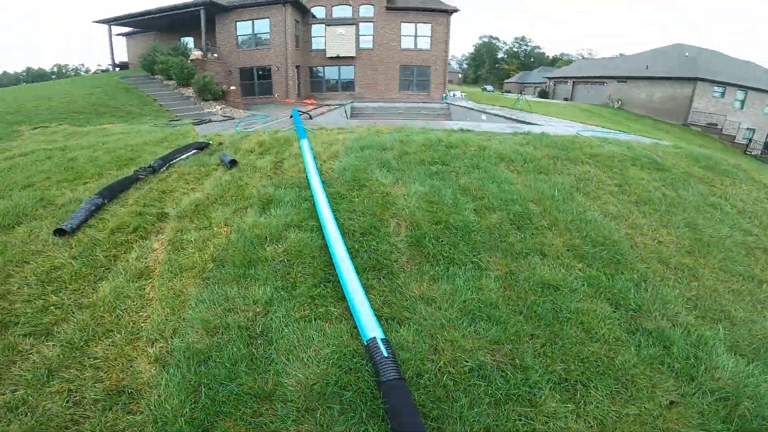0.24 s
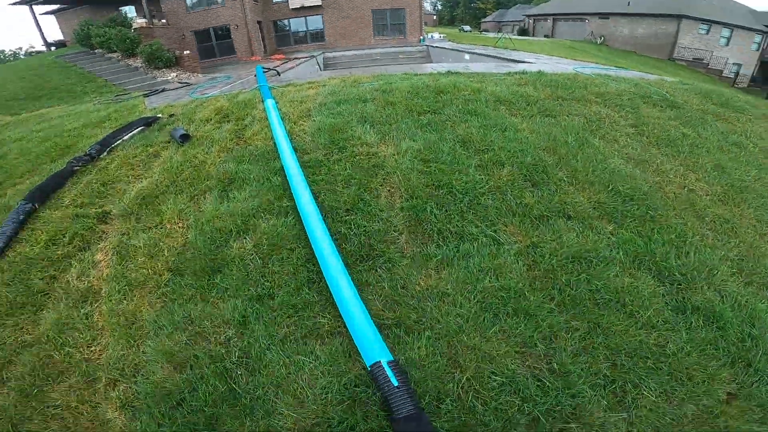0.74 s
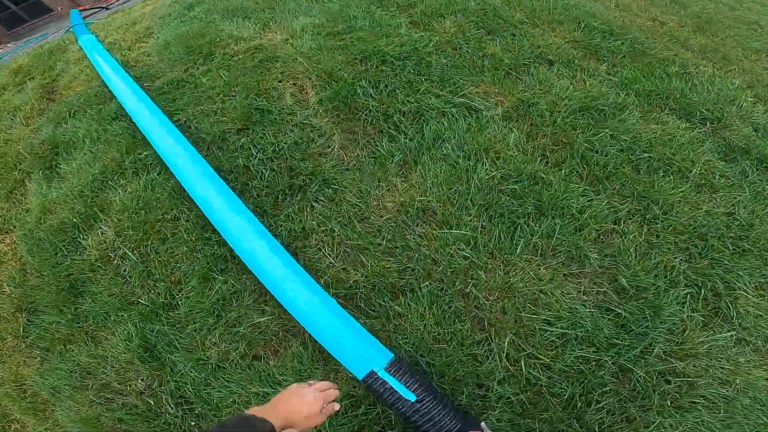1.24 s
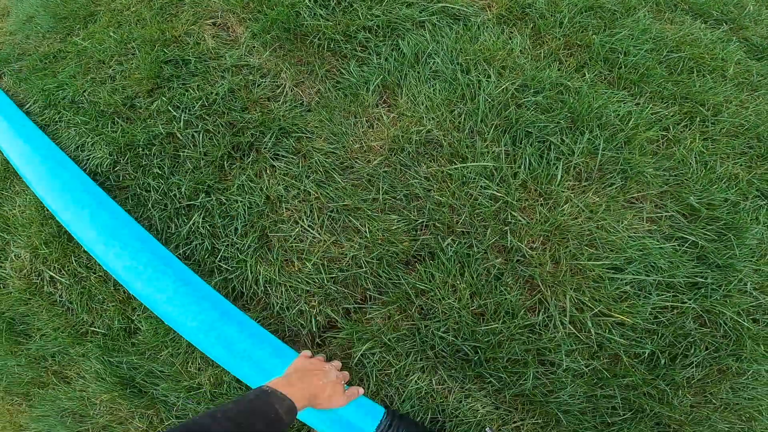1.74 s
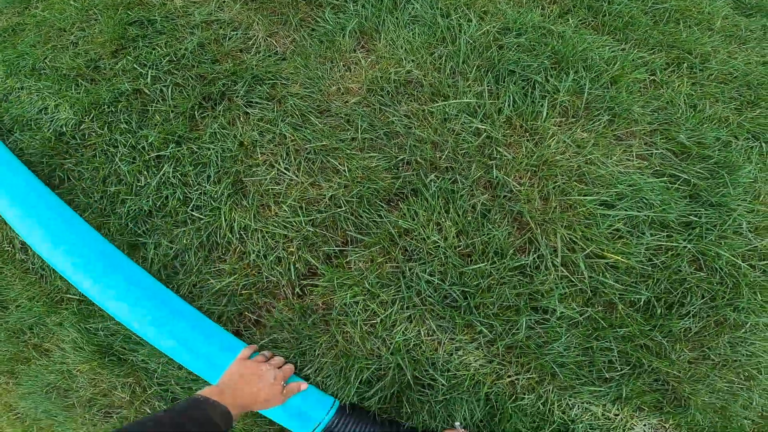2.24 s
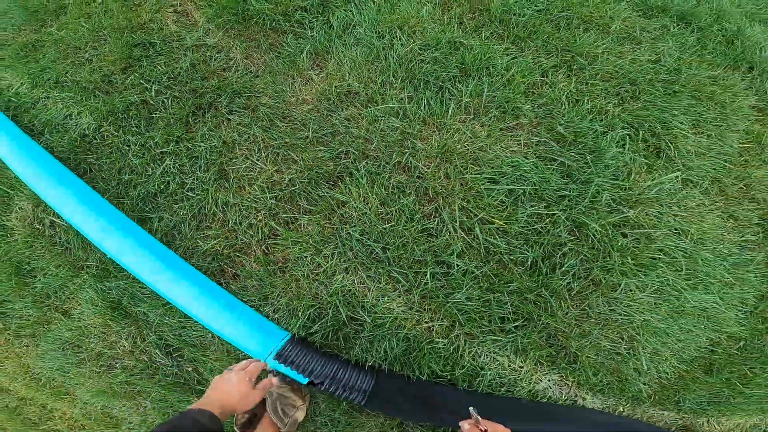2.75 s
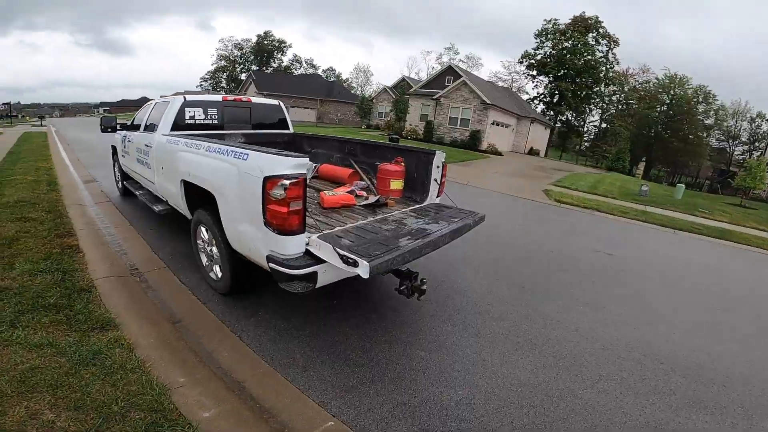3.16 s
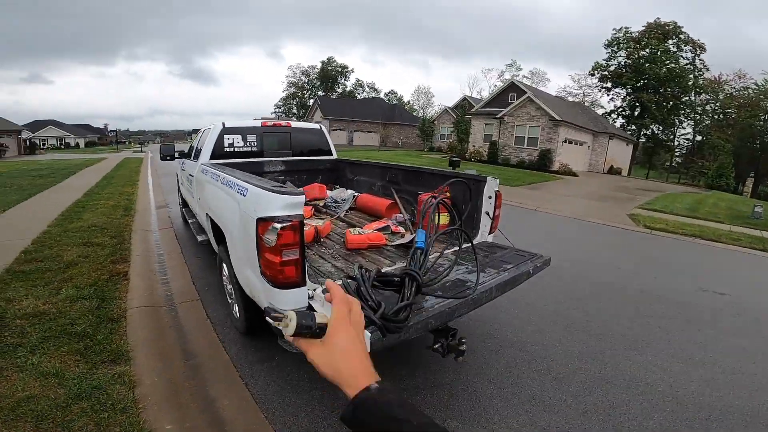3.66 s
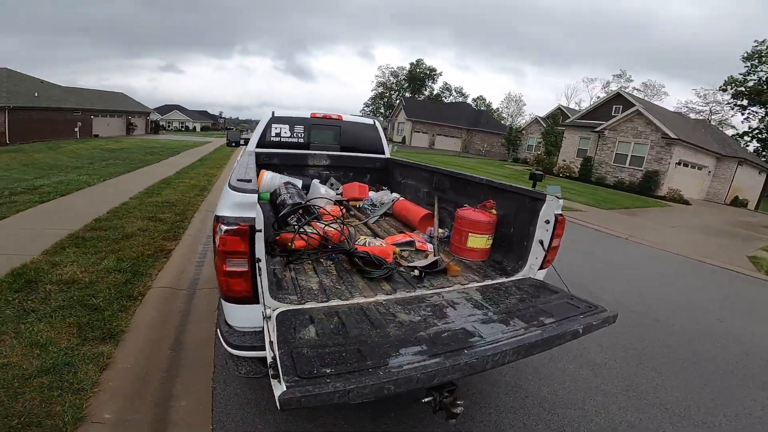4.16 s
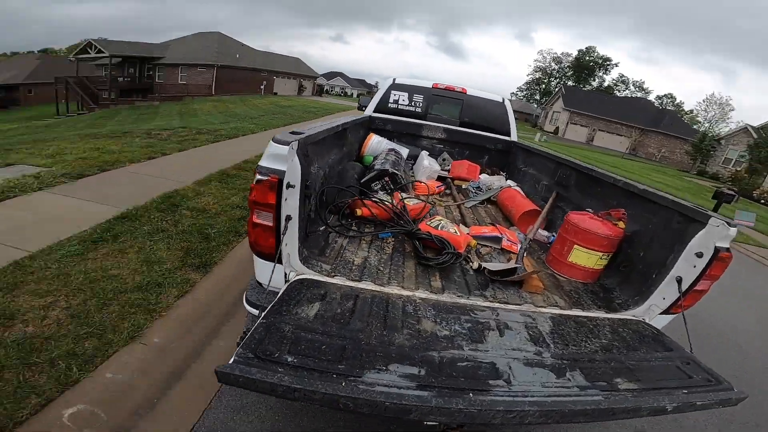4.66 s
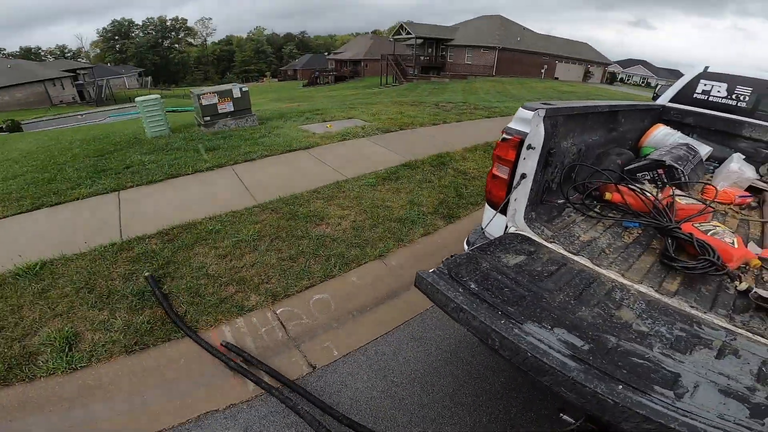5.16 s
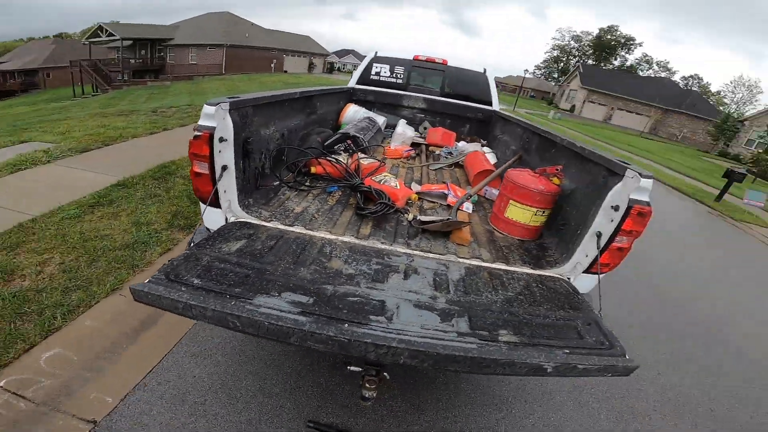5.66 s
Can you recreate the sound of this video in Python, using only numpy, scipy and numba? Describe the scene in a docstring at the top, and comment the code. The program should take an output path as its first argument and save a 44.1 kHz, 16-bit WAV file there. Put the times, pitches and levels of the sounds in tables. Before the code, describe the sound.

A hissing, hollow water flow with grass rustles cuts to a quiet street, where a coil clatters into a truck bed and ribbed hose is dragged.

```python
"""Water hisses and gurgles from a plastic hose on a lawn while hands knock it and slide it over the grass;
then, on a quiet street, a coil of cable clatters into a pickup bed and a ribbed hose is dragged along.
Spray, blades, cloth and grit are random clicks; hose, bed, fittings and cable taps are damped resonances.
A body-worn camera hears it nearly in mono, with jacket rustle, wind and handling rumble in both places."""
import sys
import numpy as np
from scipy import signal
from scipy.fft import rfft, irfft, next_fast_len
from scipy.io import wavfile
from scipy.ndimage import uniform_filter1d
from numba import njit

SR = 44100
rng = np.random.default_rng(int(sys.argv[2]) if len(sys.argv) > 2 else 0)


def store_pcm(level_fs):
    """Save levels as 16-bit WAV."""
    pcm = np.round(np.clip(level_fs, -1, 1) * 32767).astype(np.int16)
    wavfile.write(sys.argv[1], SR, np.atleast_2d(pcm).T)


N = 260190
TIME = np.arange(N) / SR
# the lawn gives way to the street
LAWN_END_S, LAWN_FADE_S = 2.9, .01

# In every colour table only the shape counts: the filter brings the overall gain to rms 1.

# flow of the water, before the shares of spray and hollow: time_s, level_db
FLOW = [(0, -47.5), (.65, -46), (1.1, -45), (1.5, -42.3), (2, -42.3), (2.5, -43.7), (2.9, -44)]
# main resonance of the water-filled hose, before it drifts: time_s, pitch_hz
HOLLOW = [(0, 2280), (1.1, 2400), (1.6, 2602), (1.95, 2700), (2.3, 2340), (2.6, 2210), (2.9, 2359)]
# resonances of the water-filled hose: multiple of the main one, width_hz, level_db
WATER_MODES = [(0.351, 260, -1), (0.429, 242, 1), (1, 500, -0.5), (1.43, 780, -4)]
# colour of the spray: frequency_hz, density_db (per Hz)
SPRAY_COLOUR = [(150, 6), (450, -5.5), (750, 4), (1080, 2), (1650, -1), (2000, -1), (2290, 7), (2800, 0),
                (3450, 1.5), (4800, -3.5), (7500, -11), (10000, -14), (13000, -23.5), (15500, -55)]
SPRAY_DB, HOLLOW_DB = -1.5, -5  # relative to the flow
GURGLE_DB, GURGLE_DRIFT = 3.2, .06  # wander of each resonance: level in dB, pitch as a share


def water():
    """Fine spray over churning noise that rings the hollow hose; its resonances shift and gurgle."""
    spray = crackle(rate=2700, spread_db=5.0, smooth_db=5) * amp(0.44 * walk(26.36))
    churn = rng.standard_normal(N)
    hollow_hz = np.interp(TIME, *np.transpose(HOLLOW))
    gurgle = np.zeros(N)
    for multiple, width_hz, db in WATER_MODES:
        level = amp(db + GURGLE_DB * walk(22.24))
        mode_hz = multiple * hollow_hz * np.exp(GURGLE_DRIFT * walk(13))
        gurgle += level * resonate(churn, mode_hz, width_hz)
    flow = amp(np.interp(TIME, *np.transpose(FLOW))) * on_lawn()
    return (amp(SPRAY_DB) * colour(spray, SPRAY_COLOUR) + amp(HOLLOW_DB) * unit(gurgle)) * flow


# splashy surges of the outflow: start_s, length_s, level_db, pitch_hz (middle of the bubble pitches)
SPLASHES = [(1.24, .08, -52, 2850), (1.86, .07, -45.5, 2850), (2.17, .17, -50, 3150),
            (2.41, .12, -50, 1700), (2.69, .04, -49, 3050)]
SPLASH_FADE_S = .035


def splashes():
    """The outflow surges and whips up small bubbles, of another size with each surge."""
    bubbles = grains(glide(SPLASHES, axis=3), octaves=.3, cycles=22, spread_db=4, rise=.2, count=3000)
    return bubbles * strokes(SPLASHES, SPLASH_FADE_S, SPLASH_FADE_S)


# pushes of the hose through the grass: start_s, length_s, level_db
PUSHES = [(1.65, 0.076, -60), (1.87, 0.14, -53), (2.24, 0.16, -45), (2.57, 0.11, -41)]
# colour of the blades: frequency_hz, density_db (per Hz)
GRASS_COLOUR = [(200, -16), (450, -8.5), (850, 10), (1600, -0.5), (2500, 4.5), (3500, 1.5), (5000, -7),
                (7000, -13), (10000, -25), (13000, -34), (15500, -51)]
PUSH_ATTACK_S, PUSH_RELEASE_S = 0.13, 0.15
GRASS_BOUNCE_DB = -17  # sound off the ground, relative to the direct sound


def grass():
    """Blades flick against the sliding hose; a bounce off the ground, moving in lag, shifts their colour."""
    blades = crackle(rate=1600, spread_db=13.0, smooth_db=0.5) * amp(walk(34.97))
    lag_s = 0.00076 * np.exp(0.3 * walk(9))
    bounced = blades + amp(GRASS_BOUNCE_DB) * np.interp(TIME - lag_s, TIME, blades)
    return colour(bounced, GRASS_COLOUR) * strokes(PUSHES, PUSH_ATTACK_S, PUSH_RELEASE_S) * on_lawn()


# loops of the coil landing in the bed: time_s, knock_db, slap_db (relative to the knock), thud_hz
BLOWS = [(4.040, -13.5, -7, 217), (4.064, -10.5, -10, 196), (4.083, -13, -15, 175), (4.100, -12, -18, 158),
         (4.112, -14, -25, 170), (4.136, -15, -12, 203), (4.150, -10.5, -14, 133), (4.166, -20, -18, 170),
         (4.217, -19, -5.5, 200), (4.230, -14, -7, 80), (4.259, -15, -13, 207), (4.270, -15, -7, 207),
         (4.284, -12, -16, 286), (4.295, -12, -15, 226), (4.304, -13, -11, 226), (4.320, -22, -24, 100),
         (4.338, -24, -20, 136), (4.354, -24, -11, 197), (4.374, -12.5, -18, 192), (4.392, -22, -14, 250),
         (4.411, -21, -17, 303), (4.431, -22.5, -15, 316), (4.483, -34, -10, 284), (4.5, -31, -12, 152.8),
         (4.538, -17.5, -22, 207), (4.609, -32, -24, 272)]
# panel modes of the bed: pitch_hz, level_db, t60_s
BED_MODES = [(135.5, -4.5, 0.42), (208, -8, 0.82), (303, -5, 0.43), (414.4, -3.5, .4), (501, 0.5, 0.36),
             (591, -6, 0.3), (726, -6, .26), (810, -8, 0.16), (1030, -0.5, 0.12), (1067, -6.5, 0.17),
             (1400, -12, 0.15)]
# the plug strikes the bed with a bright crack: time_s, level_db
CRACKS = [(4.038, -27.5), (4.065, -35), (4.153, -45), (4.303, -41)]
# colours of knock, slap and crack: frequency_hz, density_db (per Hz)
KNOCK_COLOUR = [(20, -31), (60, -6), (150, -0.5), (300, 4), (500, 1.5), (700, -0.5), (1100, -7),
                (1400, -11.5), (1650, -23), (2400, -29), (4000, -53), (9000, -72)]
SLAP_COLOUR = [(300, 11), (1200, 14), (1700, -0.5), (2300, 8), (3500, -2), (5000, -5), (6500, -13.5),
               (9000, -21.5), (11000, -27.5), (15500, -52)]
CRACK_COLOUR = [(500, -21), (2000, 10), (5000, 6), (10000, 2.5), (15500, -33)]
CRACK_T60_S = 0.019
REBOUND_S, REBOUND_DB = .011, -6.5  # a loop lands again, softer, about this much later
FLEX_DB, FLEX_REF_HZ, FLEX_TILT_DB = -20.5, 196, -5.5  # thud of the floor; tilt per octave
FLEX_SOFTNESS = 0.45  # dB more thud per dB less knock: a loop that lands flat pushes rather than strikes
SETTLE_DB_PER_S = 25  # the thuds weaken as the coil comes to rest
PANELS_DB = -9


def coil():
    """Each loop slaps the liner and rebounds, flexes the floor where it lands and rings the bed's panels."""
    knocks, slaps, cracks, thuds, panels = np.zeros((5, N))
    first_s = BLOWS[0][0]
    for s, blow_db, slap_db, thud_hz in BLOWS:
        rebound_s = s + REBOUND_S * rng.uniform(0.65, 1.9)
        for when, db in (s, blow_db), (rebound_s, blow_db + REBOUND_DB):
            # a hard first contact, then the dense ring of the liner
            add(knocks, when, amp(db + 12.0) * np.ones(1))
            add(knocks, when, amp(db) * (burst(.05) + amp(-10) * burst(.2)))
            slap = amp(2.0) * burst(0.038) + amp(-5.0) * burst(0.27)
            add(slaps, when, amp(db + slap_db) * slap)
        thud_db = FLEX_DB - FLEX_SOFTNESS * blow_db - SETTLE_DB_PER_S * (s - first_s)
        thud_db += FLEX_TILT_DB * np.log2(thud_hz / FLEX_REF_HZ)
        add(thuds, s, amp(thud_db) * ring(thud_hz, 0.13))
        # every landing spot favours other modes
        shares = rng.uniform(-0.89, 1, len(BED_MODES))
        for share, (hz, db, t60) in zip(shares, BED_MODES):
            add(panels, s, amp(blow_db + db) * share * ring(hz, t60))
    for s, db in CRACKS:
        add(cracks, s, amp(db) * burst(CRACK_T60_S))
    # neighbouring strands chatter against each other
    chatter = unit(amp(1.8 * walk(400)))
    struck = colour(knocks, KNOCK_COLOUR) + colour(slaps * chatter, SLAP_COLOUR) + colour(cracks, CRACK_COLOUR)
    return struck + thuds + amp(PANELS_DB) * panels


# loose turns of cable rattle: start_s, length_s, level_db
SETTLING = [(3.58, .11, -50), (3.77, .22, -54), (4.06, .04, -39), (4.22, .09, -39), (4.33, .1, -46),
            (4.58, .13, -51)]
STRAND_HZ, SETTLING_ATTACK_S, SETTLING_RELEASE_S = 2660, 0.008, 0.027


def strands():
    """Loose turns of cable tick against each other from the swing until the coil lies still."""
    ticks = grains(STRAND_HZ, octaves=.45, cycles=16, spread_db=2.5, rise=0, count=1300)
    return ticks * strokes(SETTLING, SETTLING_ATTACK_S, SETTLING_RELEASE_S)


# drags of the ribbed hose: start_s, length_s, hollow rasp_db, dry scrape_db, main pitch_hz (before drift)
DRAGS = [(1.42, 0.19, -48, -49, 960), (1.59, 0.11, -46, -47, 1042), (1.76, 0.22, -48.5, -47, 1013),
         (2.0, 0.34, -74, -50, 900), (5.12, 0.13, -41.5, -57, 1120), (5.335, 0.16, -38.5, -49, 1150),
         (5.47, 0.15, -35, -37, 1080), (5.72, 0.084, -40.5, -46, 1110), (5.84, .06, -46, -54, 963)]
# a rib snags and lets go: time_s, rasp_db, scrape_db
SNAGS = [(5.067, -40, -41), (5.091, -42, -38), (5.106, -40, -34), (5.236, -35, -37), (5.260, -38, -33),
         (5.331, -30, -33), (5.354, -23.5, -35), (5.415, -24, -29.5), (5.441, -29, -46), (5.469, -31, -31),
         (5.501, -29, -33), (5.546, -29, -37), (5.572, -30, -35), (5.621, -29, -35), (5.649, -29, -31),
         (5.733, -35, -40), (5.819, -38, -37), (5.868, -34, -50)]
# resonances of the ribbed hose: multiple of the main one, width_hz, level_db
HOSE_MODES = [(1, 140, 2), (.8, 300, -8), (1.8, 190, -8), (2.08, 125, -8), (2.5, 340, -18.5)]
# colour of the scraping skin: frequency_hz, density_db (per Hz)
SCRAPE_COLOUR = [(300, 0), (900, 11.5), (1600, -21), (2600, 8), (4800, -2.5), (6500, -5.5), (10000, -10.5),
                 (11200, -26), (13000, -16), (15500, -52)]
DRAG_ATTACK_S, DRAG_RELEASE_S = 0.036, 0.052
SNAG_RING_T60_S, SNAG_SCRAPE_T60_S = .06, .03
BEND_DRIFT = .03  # wander of each resonance, as a share of its pitch


def dragged_hose():
    """Ribs catch one after another; the tube rings hollow, retuned as it bends, while its skin scrapes."""
    rib_hz = 70 * np.exp(0.32 * walk(50))
    rib_cycle = np.cos(2 * np.pi * np.cumsum(rib_hz) / SR)
    catching = unit(amp(2.4 * rib_cycle + walk(120)))
    ribs = crackle(rate=1200, spread_db=1.0, smooth_db=2.0) * catching
    main_hz = glide(DRAGS, axis=4)
    tube = np.zeros(N)
    for multiple, width_hz, db in HOSE_MODES:
        mode_hz = multiple * main_hz * np.exp(BEND_DRIFT * walk(30))
        tube += amp(db) * resonate(ribs, mode_hz, width_hz)
    skin = crackle(rate=1500, spread_db=3.5, smooth_db=0)
    rasp = strokes(DRAGS, DRAG_ATTACK_S, DRAG_RELEASE_S)
    scrape = strokes(DRAGS, DRAG_ATTACK_S, DRAG_RELEASE_S, axis=3) * catching
    for s, rasp_db, scrape_db in SNAGS:
        add(rasp, s, amp(rasp_db) * fade(SNAG_RING_T60_S))
        add(scrape, s, amp(scrape_db) * fade(SNAG_SCRAPE_T60_S))
    return unit(tube) * rasp + colour(skin, SCRAPE_COLOUR) * scrape


GRIT_HZ, GRIT_DB = 4200, -6  # middle pitch; level relative to the dry scrape of the drags


def road_grit():
    """Grit crunches in tiny snaps under the hose as it is dragged over the road."""
    snaps = grains(GRIT_HZ, octaves=1.1, cycles=5, spread_db=5, rise=0, count=1500)
    drags = strokes(DRAGS, DRAG_ATTACK_S, DRAG_RELEASE_S, axis=3)
    return amp(GRIT_DB) * snaps * drags * (1 - on_lawn())


# knocks and ticks of hose, fittings and cable strands: time_s, ring level_db, pitch_hz (once relaxed),
# t60_s, rattle_db (relative to the ring)
KNOCKS = [(1.368, -41, 524, 0.049, 2.5), (1.454, -23.5, 224, 0.16, -40), (1.550, -25, 390, 0.045, -14),
          (1.551, -24, 926, 0.045, -14), (1.556, -31.5, 2470, 0.033, -20), (3.282, -36, 580, 0.035, -7),
          (3.528, -39, 1870, .06, 1), (3.576, -33, 1220, .03, -3), (3.613, -33, 1050, .03, 0),
          (3.617, -30, 2500, .03, -2), (3.853, -39, 3300, .012, 0), (3.912, -25, 1080, .03, -3),
          (3.922, -34, 1300, .02, -2), (3.970, -38, 2150, .015, -2), (4.041, -29, 4400, .022, 2),
          (4.065, -23, 2400, .025, -6), (4.100, -22, 1680, .025, -8), (4.135, -21, 1570, .025, -7),
          (4.219, -25, 2410, .03, -4), (4.233, -24, 2900, .025, -6), (4.272, -21, 1790, .025, -7),
          (4.148, -22, 3300, .048, 1), (4.305, -15, 2060, .022, -7), (4.538, -31, 914, .05, -10),
          (4.606, -28, 2650, .02, -12), (4.644, -35, 2640, .02, -21), (4.854, -36.5, 1050, .02, 1),
          (4.914, -31, 2100, .02, 3), (5.383, -22, 2206, .05, -10)]
CLICK_DB = -8  # contact click relative to the rattle


def knocks_and_taps():
    """Short hard knocks and taps: a contact click, one damped ring and a rattle of modes around it."""
    rings, clicks = np.zeros((2, N))
    for s, db, hz, t60, rattle_db in KNOCKS:
        rattle = unit(resonate(rng.standard_normal(SR // 2), hz, 650 + hz / 4)) * fade(t60)
        # the ring starts 90 Hz sharp
        add(rings, s, amp(db) * (ring(hz, t60, sag=90 / hz) + amp(rattle_db) * rattle))
        add(clicks, s, amp(db + rattle_db + CLICK_DB) * burst(0.026))
    return rings + colour(clicks, SLAP_COLOUR)


# body movements that rustle the jacket and shake the camera mount:
# start_s, length_s, cloth_db, judder_db, judder_hz (before its jitter)
MOVES = [(0, 0.064, -50.5, -73, 161), (.85, 0.013, -47.5, -53, 160), (1.87, 0.33, -47.5, -44.5, 149.3),
         (2.86, 0.06, -56, -45, 150), (3.42, .08, -52, -52, 150), (3.535, 0.11, -40.5, -36.5, 149.8),
         (3.645, 0.12, -51.5, -29.5, 123.1), (3.85, 0.22, -48, -36, 143.3), (4.55, 0.19, -49, -40.5, 182.7),
         (4.8, 0.304, -47.5, -69, 150.7), (5.11, 0.091, -36, -38.5, 175), (5.258, 0.057, -32.5, -21, 165),
         (5.55, 0.4, -37.5, -50, 220.2)]
# colour of the cloth: frequency_hz, density_db (per Hz)
CLOTH_COLOUR = [(120, -29.5), (400, 0), (750, -1.5), (1150, -1.5), (1600, -7.5), (2300, -4.5), (3500, -12),
                (6000, -19.5), (10000, -28.5), (13000, -42), (15500, -79)]
MOVE_ATTACK_S, CLOTH_RELEASE_S = 0.012, 0.19


def jacket():
    """Folds of cloth catch and slip in quick uneven spurts."""
    folds = crackle(rate=900, spread_db=3.3, smooth_db=1) * amp(2 * walk(110))
    return colour(folds, CLOTH_COLOUR) * strokes(MOVES, MOVE_ATTACK_S, CLOTH_RELEASE_S)


JUDDER_RELEASE_S = 0.036
JUDDER_REST_DB = -56.5  # the mount is never quite still
JUDDER_JITTER, JUDDER_ROUGH_DB = 0.22, 5  # spread of the cycle rate (share) and of the cycle size


def mount():
    """With each body movement the camera mount judders in uneven stick-slip cycles."""
    judder_hz = glide(MOVES, axis=4) * np.exp(JUDDER_JITTER * walk(260))
    phase = 2 * np.pi * np.cumsum(judder_hz) / SR
    cycles = np.sin(phase) + amp(-13) * np.sin(2 * phase)
    judder = unit(cycles * amp(JUDDER_ROUGH_DB * walk(110)))
    return judder * np.hypot(amp(JUDDER_REST_DB), strokes(MOVES, MOVE_ATTACK_S, JUDDER_RELEASE_S, axis=3))


# gusts on the microphone: start_s, length_s, level_db
GUSTS = [(.06, 0.1, -44), (.9, 0.052, -48), (1.35, 0.94, -47.5), (2.5, 0.71, -45), (3.19, 0.16, -38.5),
         (3.58, 0.15, -32.5), (3.85, 0.96, -41), (4.74, 0.041, -33), (5.0, 0.13, -38), (5.5, 0.46, -48.5)]
# colour of the wind: frequency_hz, density_db (per Hz)
WIND_COLOUR = [(15, -17), (30, -1), (70, -2), (110, -5), (200, -15.5), (500, -22), (2000, -60)]
GUST_ATTACK_S, GUST_RELEASE_S = 0.11, 0.089


def wind():
    """Gusts buffet the microphone as low rumbling noise."""
    return colour(rng.standard_normal(N), WIND_COLOUR) * strokes(GUSTS, GUST_ATTACK_S, GUST_RELEASE_S)


# eddies that hit the two microphone ports in opposition: start_s, length_s, level_db
EDDIES = [(0, 0.086, -54.5), (2.6, .3, -69)]
EDDY_SWELL_S = 0.13


def eddies():
    """Wind noise on the lawn, meant for the side signal: it pushes one port while it pulls the other."""
    buffeting = colour(rng.standard_normal(N), WIND_COLOUR)
    return buffeting * strokes(EDDIES, EDDY_SWELL_S, EDDY_SWELL_S) * on_lawn()


# colour of the street: frequency_hz, density_db (per Hz)
STREET_COLOUR = [(18, -10), (30, -18), (119, -12.5), (597, -24), (1090, -20), (1600, -30.5), (2990, -28.5),
                 (7630, -41.5), (8690, -39), (13200, -63), (15000, -69)]
STREET_DB = -55


def street():
    """The faint steady wash of the neighbourhood, under both places; it swells by about a decibel."""
    swell = amp(walk(4.2))
    return colour(rng.standard_normal(N), STREET_COLOUR) * amp(STREET_DB) * swell


SHEEN_DB = 7  # relative to the treble level


def sheen(mono):
    """A faint treble noise whose level follows the treble of the sound."""
    top = signal.butter(8, 11500, "high", fs=SR, output="sos")
    treble_level = uniform_filter1d(np.abs(signal.sosfilt(top, mono)), SR // 200)  # 5 ms average
    return unit(signal.sosfilt(top, rng.standard_normal(N))) * treble_level * amp(SHEEN_DB)


def amp(db):
    """Decibels to gain."""
    return 10 ** (np.asarray(db) / 20)


def unit(x):
    """Scale to rms 1."""
    return x / np.sqrt(np.mean(x ** 2))


def add(track, s, sound):
    """Mix a sound into a track at time s."""
    i = max(int(s * SR), 0)
    track[i:i + len(sound)] += sound[:N - i]


def colour(x, points):
    """Causal minimum-phase filter with the given spectrum shape; keeps the power of white noise."""
    size = next_fast_len(N + SR // 2, True) // 2 * 2
    hz, db = np.transpose(points)
    freq = np.maximum(np.arange(size // 2 + 1) * SR / size, 1)
    gain = unit(amp(np.interp(np.log(freq), np.log(hz), db)))
    # folding the cepstrum onto positive times makes the filter causal
    cepstrum = irfft(np.log(gain))
    cepstrum[1:size // 2] *= 2
    cepstrum[size // 2 + 1:] = 0
    return irfft(rfft(x, size) * np.exp(rfft(cepstrum)))[:N]


@njit
def sweep(x, hz, width_hz):
    """A resonance whose centre may move, gain 1 at the centre."""
    y, band, low = np.empty(len(x)), 0., 0.
    for i in range(len(x)):
        g, k = np.tan(np.pi * hz[i] / SR), width_hz / hz[i]
        v = (band + g * (x[i] + 1e-18 - low)) / (1 + g * (g + k))
        band, low, y[i] = 2 * v - band, low + 2 * g * v, k * v
    return y


def resonate(x, hz, width_hz):
    """A resonance applied twice, for steep skirts."""
    centre = np.ones(len(x)) * hz
    once = sweep(x, centre, float(width_hz))
    return sweep(once, centre, float(width_hz))


def walk(rate):
    """Random wander with rms 1, in straight lines between `rate` random points a second."""
    steps = rng.standard_normal(N // 10)
    return unit(np.interp(TIME * rate, np.arange(len(steps)), steps))


def crackle(rate, spread_db, smooth_db):
    """Random tiny clicks, `rate` a second and unequal in size, over a bed too dense to tell apart."""
    size = amp(spread_db * np.minimum(rng.exponential(size=N), np.pi))
    clicks = (rng.random(N) < rate / SR) * size * rng.choice([-1, 1], N)
    return unit(unit(clicks) + amp(smooth_db) * rng.standard_normal(N))


def grains(hz, octaves, cycles, spread_db, rise, count):
    """Tiny rings, random in time, pitch and size, up to 10 ms; pitch climbs by share rise over the cycles."""
    when, pitch, size = rng.random((count, 3)).T
    start, steps = (when * N).astype(int), np.arange(SR // 100)
    freq = np.broadcast_to(hz, N)[start] * 2 ** (octaves * (2 * pitch - 1))
    age = np.outer(freq, steps / SR)  # in cycles
    waves = np.sin(2 * np.pi * age * (1 + rise * age / cycles / 2))
    waves *= np.exp(-np.log(1000) * age / cycles)
    gain = amp(spread_db * np.minimum(-np.log(1 - size), np.pi))
    places = (start[:, None] + steps).ravel()
    return unit(np.bincount(places, (gain[:, None] * waves).ravel(), N)[:N])


def fade(t60):
    """Exponential decay by 60 dB in t60 seconds, cut after half a second."""
    return np.exp(-np.log(1000) * TIME[:SR // 2] / t60)


def ring(hz, t60, sag=0):
    """A damped vibration that starts sharp by the share sag and relaxes to its pitch."""
    pitch = hz * (1 + sag * fade(t60 * 0.25))
    return np.sin(2 * np.pi * np.cumsum(pitch) / SR) * fade(t60)


def burst(t60):
    """A dying patch of noise: many close modes struck at once."""
    return rng.standard_normal(SR // 2) * fade(t60)


def stroke(start, length, attack_s, release_s):
    """Envelope that swells up to its start, holds for its length and dies away exponentially."""
    early, late = np.maximum(start - TIME, 0), np.maximum(TIME - start - length, 0)
    return np.exp(-np.minimum(early / attack_s + late / release_s, 20))


def strokes(rows, attack_s, release_s, axis=2):
    """Joint gain of a table of strokes (start, length, ..), with their dB in the given column."""
    power = np.zeros(N)
    for row in rows:
        power += (amp(row[axis]) * stroke(row[0], row[1], attack_s, release_s)) ** 2
    return np.sqrt(power)


def glide(rows, axis):
    """A pitch that slides from the middle of one stroke to the next."""
    rows = np.array(rows)
    return np.interp(TIME, rows[:, 0] + rows[:, 1] / 2, rows[:, axis])


def on_lawn():
    """1 on the lawn, fading to 0 on the street."""
    return stroke(0, LAWN_END_S, LAWN_FADE_S, LAWN_FADE_S)


# shape of the lawn's side signal: frequency_hz, relative level_db
LAWN_WIDTH = [(300, -13), (900, -36.5), (1650, -21), (2300, -32), (3400, -22), (8000, -9), (14000, -0.5)]
WATER_SIDE_DB, GRASS_SIDE_DB = -21, 6  # before the shape


def scene():
    """Nearly mono: the lawn and its wind are slightly wide, and a faint sheen lies on the right."""
    mono = water() + splashes() + grass() + jacket()
    mono += coil() + strands() + knocks_and_taps() + dragged_hose() + road_grit()
    mono += wind() + mount() + street()
    opposed_wind = eddies()
    # fresh random draws of water and grass make the width
    lawn_side = amp(WATER_SIDE_DB) * water() + amp(GRASS_SIDE_DB) * grass()
    side = colour(lawn_side, LAWN_WIDTH) + opposed_wind
    return np.array([mono + side, mono - side + sheen(mono)])


PORT_HZ, PORT_WIDTH_HZ, PORT_DB = 8420, 1350, -6
CEILING, TOP_HZ = .65, 15550  # limit of the rounded peaks (full scale 1); upper edge of the passband


def record(dry):
    """The microphone port rings in the treble, the loudest peaks are rounded off and the top is cut."""
    port = np.array([resonate(channel, PORT_HZ, PORT_WIDTH_HZ) for channel in dry])
    ported = dry + amp(PORT_DB) * port
    rounded = ported / (1 + (ported / CEILING) ** 4) ** (1 / 4)
    top_cut = signal.ellip(14, .2, 80, TOP_HZ, fs=SR, output="sos")
    return signal.sosfilt(top_cut, rounded)


dry = scene()
out = record(dry)
store_pcm(out)
```